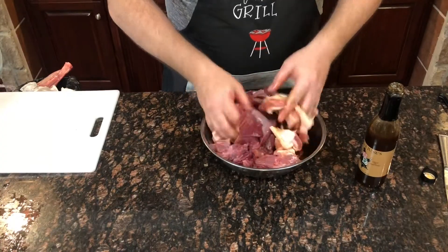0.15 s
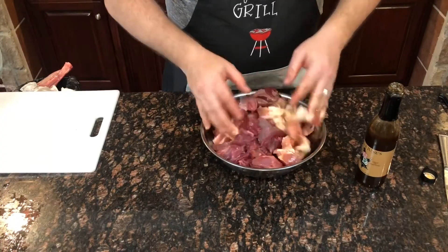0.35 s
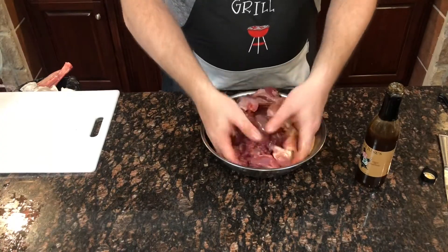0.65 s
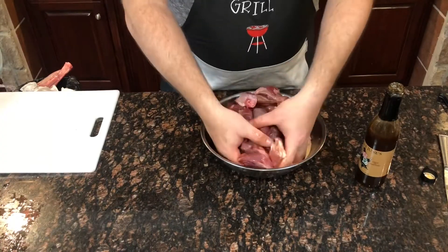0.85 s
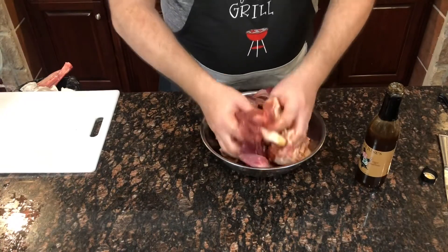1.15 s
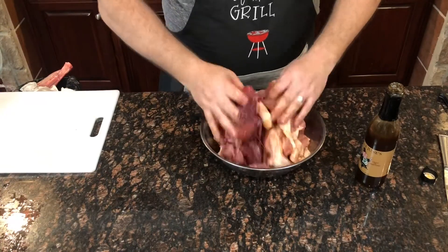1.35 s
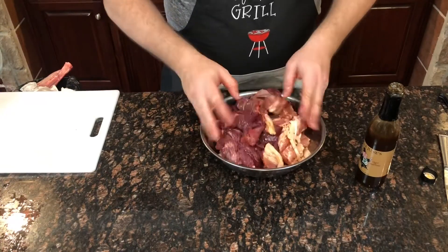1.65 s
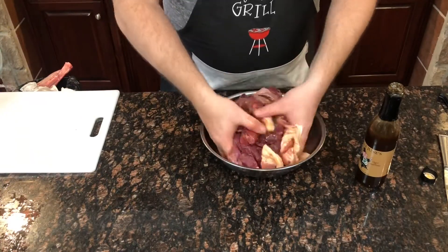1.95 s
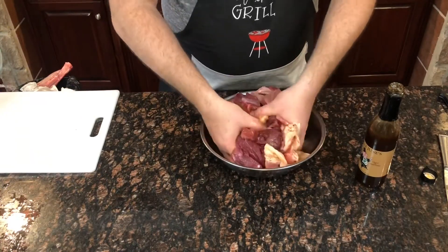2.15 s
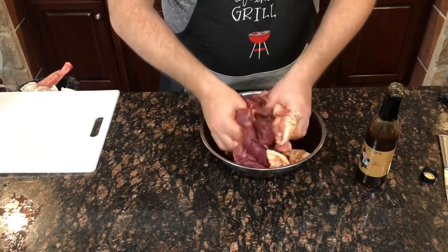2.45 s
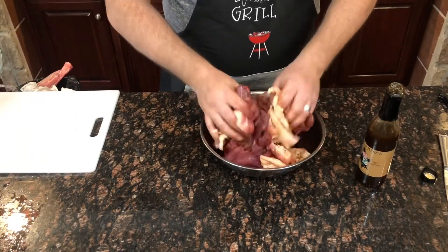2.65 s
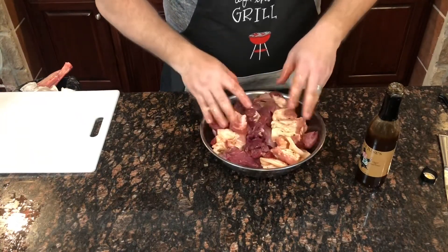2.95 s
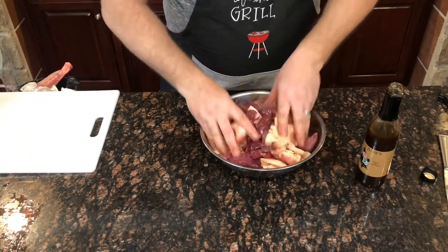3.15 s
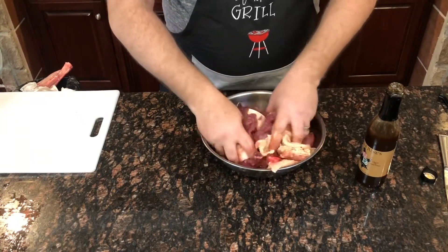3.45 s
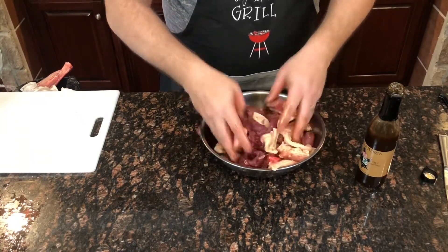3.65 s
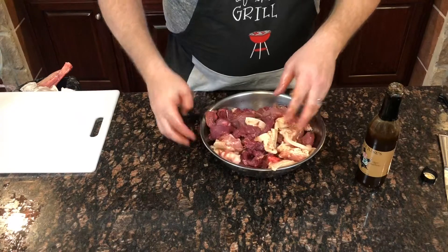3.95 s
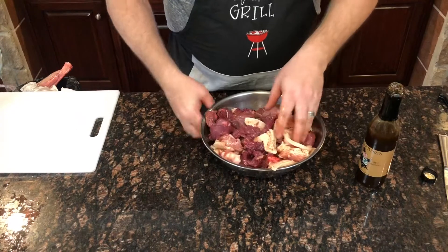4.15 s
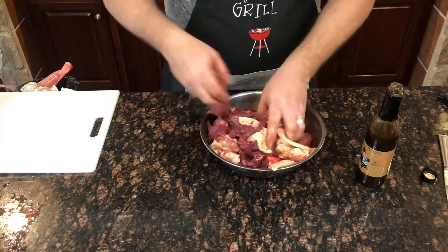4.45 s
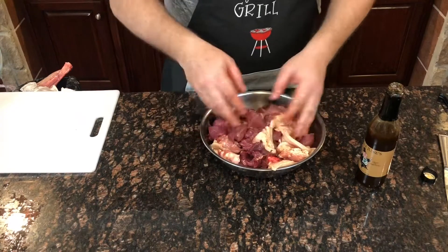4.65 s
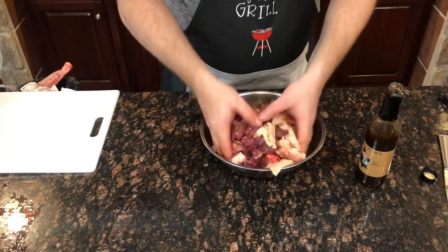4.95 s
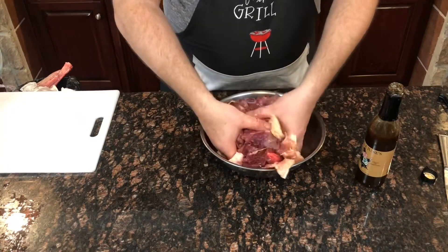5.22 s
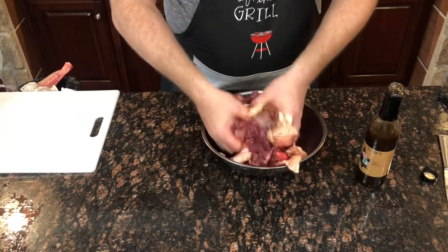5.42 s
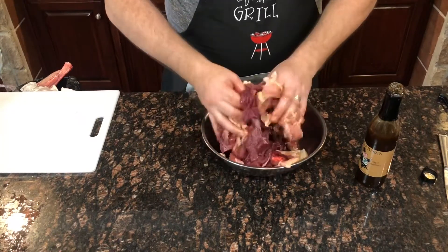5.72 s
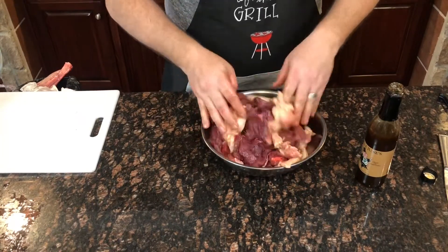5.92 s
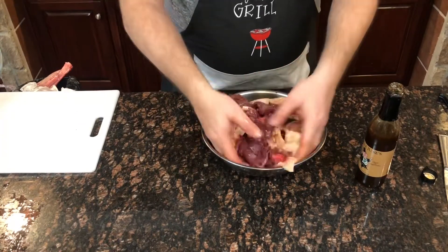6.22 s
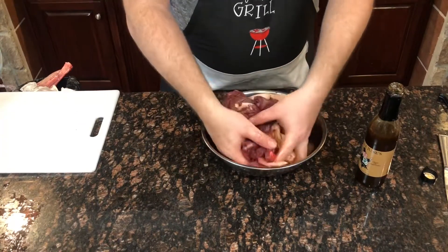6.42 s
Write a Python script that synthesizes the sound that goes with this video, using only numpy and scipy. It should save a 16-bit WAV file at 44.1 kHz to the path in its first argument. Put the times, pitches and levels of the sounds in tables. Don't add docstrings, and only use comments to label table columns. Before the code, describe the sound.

Hands knead wet raw meat in a thin steel bowl with soft squelches, sticky crackles, sharp smacks and one bright rim clang near the end.

```python
import sys
import numpy as np
from scipy import signal
from scipy.fft import rfft, irfft
from scipy.io import wavfile

SR = 44100
rng = np.random.default_rng(int(sys.argv[2]) if len(sys.argv) > 2 else 0)


def put_to_file(sound):
    columns = np.atleast_2d(sound).T
    safe = np.clip(columns, -1, 1)
    whole_steps = np.round(safe * 32767)
    wavfile.write(sys.argv[1], SR, whole_steps.astype(np.int16))


def invert_db(level):
    return 10 ** (np.asarray(level, dtype=float) / 20)


N = 290237


def rms_one(x):
    return x / np.sqrt(np.mean(x ** 2) + 1e-20)


def at_hz(points, hz):
    table_hz, values = np.transpose(points)
    return np.interp(np.log(hz), np.log(table_hz), values)


def in_time(rows):
    s, *columns = np.transpose(rows)
    return [np.interp(np.arange(N) / SR, s, c) for c in columns]


def drift(rate):
    r = np.exp(-80 * np.pi * rate / SR)
    noise = rng.standard_normal(N // 40 + 2002)
    slow = signal.lfilter([1], [1, -2 * r, r * r], noise)[2000:]
    return np.interp(np.arange(N) / 40, np.arange(len(slow)), rms_one(slow))


def ring(x, hz, t60):
    r, w = invert_db(-60 / (t60 * SR)), 2 * np.pi * hz / SR
    return signal.lfilter([0, np.sin(w)], [1, -2 * r * np.cos(w), r * r], x + 1e-18)


def add(track, s, sound):
    i = round(s * SR)
    track[i:i + len(sound)] += sound[:N - i]


def coloured(x, spectrum):
    hz = np.maximum(np.arange(len(x) // 2 + 1) * SR / len(x), 1)
    return rms_one(irfft(rfft(x) * invert_db(at_hz(spectrum, hz)), len(x)))


def grains(per_s, spread_db, clump_db):
    sizes = invert_db(spread_db * np.minimum(rng.exponential(1, N), 4)) * rng.choice([-1, 1], N)
    return sizes * (rng.random(N) < per_s * invert_db(clump_db * drift(15)) / SR)


def crackle(low_hz, high_hz, per_s, cycles, spread_db):
    clicks = grains(per_s, spread_db, clump_db=7.5)
    dealt = rng.integers(0, 12, N)
    pitches = low_hz * (high_hz / low_hz) ** (np.arange(12) / 11)
    return rms_one(sum(ring(clicks * (dealt == k), hz, cycles / hz) for k, hz in enumerate(pitches)))


# (frequency [Hz], level [dB per Hz])
ROOM_AIR = [(15, -63), (25, -15), (60, -9.5), (202, -3), (296, -5), (410, -5.5), (457, -9), (876, -15.5),
            (977, -23.5), (3900, -30), (12900, -40), (15700, -32), (15950, -63)]


def room_air():
    return invert_db(-60.5) * coloured(rng.standard_normal(N), ROOM_AIR)


# (time [s], level [dB rms])
HUM_SWELL = [(0.0, -68.5), (0.09, -60.5), (4.23, -67), (4.55, -62), (4.76, -67.5), (5.33, -59), (5.44, -67),
             (6.34, -62), (6.58, -70)]
# (frequency [Hz], width [Hz], level [dB rms])
DRONE_BANDS = [(119.5, 3.6, -72), (153.1, 8.8, -68.5), (176.4, 3.2, -69.5), (246.6, 18, -69.5)]


def appliance():
    turns = 203.6 * np.arange(N) / SR
    tone = invert_db(in_time(HUM_SWELL)[0] + 3.5 + 1.0 * drift(16.0)) * np.sin(2 * np.pi * turns)
    octave = invert_db(-71 + 3 + 2.2 * drift(1.5)) * np.sin(4 * np.pi * turns)
    drone = sum(invert_db(db) * rms_one(ring(rng.standard_normal(N), hz, 3.1 / width))
                for hz, width, db in DRONE_BANDS)
    return tone + octave + drone


# (frequency [Hz], t60 [s])
KITCHEN_T60 = [(500, 0.89), (1500, 0.52), (4000, 0.34), (10000, 0.29)]


def kitchen(x):
    t, tail = np.arange(SR) / SR, 0
    for hz in 350 * 2. ** np.arange(6):
        band = signal.butter(2, [hz / np.sqrt(2), hz * np.sqrt(2)], "band", fs=SR, output="sos")
        fade = invert_db(-60 * t / at_hz(KITCHEN_T60, hz))
        tail = tail + signal.sosfilt(band, rng.standard_normal(SR)) * fade
    tail = tail * (1 - np.exp(-(t / 0.00093) ** 2))
    return invert_db(-7) * signal.fftconvolve(x, tail / np.sqrt(np.sum(tail ** 2)))[:N]


# (time [s], peak level [dB], pitch [Hz], t60 [s])
COUNTER_THUMPS = [
    (1.617, -47, 270, 0.54),
    (2.619, -47.5, 96, 0.29),
    (4.372, -43, 89.4, 0.25),
    (4.669, -44, 252, 0.17),
    (5.967, -49.5, 83.4, 0.29),
]


def thumps():
    out, t = np.zeros(N), np.arange(18000) / SR
    for s, db, hz, t60 in COUNTER_THUMPS:
        noise = rng.standard_normal(len(t))
        band = signal.butter(2, [hz / 2.3, hz * 1.37], "band", fs=SR, output="sos")
        thump = signal.sosfilt(band, noise * (1 - np.exp(-t / 0.0061)) * invert_db(-60 * t / t60))
        add(out, s, invert_db(db) * thump / np.abs(thump).max())
    return out


# (time [s], peak level [dB], pitch [Hz], t60 [s])
BASE_NOTES = [(1.614, -43.5, 815, 0.1), (2.543, -46, 820, 0.1), (4.672, -35.5, 757, 0.037),
              (4.893, -44.5, 670, .08), (6.302, -41, 866, 0.046), (1.616, -48.5, 269, 0.17),
              (5.21, -44, 770, 0.057)]


def base_notes():
    out, t = np.zeros(N), np.arange(18000) / SR
    for s, db, hz, t60 in BASE_NOTES:
        swell = invert_db(db - 60 * t / t60) * (1 - np.exp(-t / .004))
        partner = invert_db(-5) * np.sin(2 * np.pi * hz * .87 * t)
        add(out, s, swell * (np.sin(2 * np.pi * hz * t) + partner))
    return out


def metal(t, modes):
    return sum(invert_db(db - 60 * t / t60) * np.sin(2 * np.pi * hz * t) for hz, db, t60 in modes)


# (time [s], peak level [dB], slap t60 [s], metal ring [dB], lowest slap frequency [Hz])
BOWL_KNOCKS = [(0.325, -40.5, 0.027, -5, 1200), (0.492, -38, 0.012, -16, 1000),
               (1.303, -32, 0.016, -13, 2010), (1.61, -37, 0.066, -14, 895),
               (2.542, -37.5, 0.026, -7.5, 800), (4.672, -27, 0.031, -28, 450),
               (5.208, -34, 0.016, -27, 700), (5.316, -37.5, 0.023, -13, 1200),
               (6.079, -30.5, 0.055, -28, 1270)]
# (frequency [Hz], level [dB], t60 [s])
LOADED_BOWL = [(1840, -10, .04), (2700, -4, .06), (3190, -4, .05), (3800, -2, .06), (4540, -5, .04),
               (5300, -7, .03), (6200, -8, .03)]


def knocks():
    out, t = np.zeros(N), np.arange(13000) / SR
    for s, db, t60, ring_db, low_hz in BOWL_KNOCKS:
        band = signal.butter(2, [low_hz, 8000], "band", fs=SR)
        slap = signal.lfilter(*band, rng.standard_normal(len(t)) * invert_db(-60 * t / t60))
        add(out, s, invert_db(db) * (slap / np.abs(slap).max() + invert_db(ring_db) * metal(t, LOADED_BOWL)))
    return out


# (time [s], peak level [dB], crack t60 [s], shimmer t60 [s])
RING_CLANG = [
    (6.107, -14.5, 0.023, 0.52),
]
# (frequency [Hz], level [dB per Hz])
RIM_SHIMMER = [(180, -41), (300, -11), (490, -25), (703, -1.5), (801, -13.5), (1850, 0), (2070, -6),
               (3790, -19), (4180, -30), (4540, -7), (4850, -19), (6620, -13), (15000, -32.5)]
# (frequency [Hz], level [dB], t60 [s])
FREE_RIM = [(1200, -10.5, .15), (1640, -9.5, 0.27), (1780, -12, .25), (1844, -7, .3), (1963, -8.5, .25),
            (2659, -3, .4), (2830, -2, 0.27), (3184, -5.5, .3), (3760, -0.5, 0.8), (3850, -11, .4),
            (4550, -4, 0.27), (5350, -13, .15), (6280, -15, 0.13), (9820, -7.5, 0.054)]


def clang():
    out, t = np.zeros(N), np.arange(30000) / SR
    for s, db, crack_t60, shimmer_t60 in RING_CLANG:
        shimmer = coloured(rng.standard_normal(len(t)), RIM_SHIMMER)
        touch = invert_db(-60 * t / crack_t60)
        modes = (invert_db(-38.5) + invert_db(-3) * touch) * metal(t, FREE_RIM)
        noise = shimmer * (invert_db(-4.0) * touch + invert_db(-27.0 - 60 * t / shimmer_t60))
        add(out, s - .0007, invert_db(db) * (modes + noise) * (1 - np.exp(-t / 0.0005)))
    return out


# (start time [s], length [s], level [dB rms], pitch [Hz], final pitch sag [share])
AIR_SEEPS = [
    (2.68, 0.32, -72, 14700, .15),
    (5.58, 0.4, -73, 14600, .02),
    (6.2, .14, -72, 14300, .02),
]


def seeps():
    out = np.zeros(N)
    for s, length, db, hz, sag in AIR_SEEPS:
        u = np.arange(round(length * SR)) / (length * SR)
        low = signal.butter(2, 250, fs=SR)
        a, b = signal.lfilter(*low, rng.standard_normal((2, SR)))[:, :len(u)]
        angle = 2 * np.pi * np.cumsum(hz * (1 - sag * u ** 5)) / SR
        whistle = rms_one(a * np.cos(angle) + b * np.sin(angle))
        add(out, s, invert_db(db) * np.sqrt(np.sin(np.pi * u)) * whistle)
    return out


# (time of peak [s], swish level [dB], rise [s], fall [s])
STROKES_OFF = [
    (0.561, -58.5, 0.28, 0.2),
    (1.76, -55, 0.12, 0.22),
    (4.9, -57, 0.25, 0.15),
]
# (frequency [Hz], level [dB per Hz])
SWISH_COLOUR = [(3500, -28), (5600, -11), (6600, -2.5), (7600, -5.5), (9000, -9), (11000, -13),
                (15000, -16)]


def swish():
    t = np.arange(N) / SR
    level = sum(invert_db(db - 20 * np.maximum((s - t) / rise, (t - s) / fall))
                for s, db, rise, fall in STROKES_OFF)
    return level * invert_db(2.6 * drift(28)) * coloured(rng.standard_normal(N), SWISH_COLOUR)


def surge():
    t = np.arange(N) / SR
    surge_db, squeeze_s, drain_s = 8, 0.034, 0.11
    return sum(surge_db * np.exp(-np.maximum((s - t) / squeeze_s, (t - s) / drain_s) ** 2)
               for s, *_ in STROKES_OFF)


def bursts(events, cycles, rise, tick_db):
    out, t = np.zeros(N), np.arange(1300) / SR
    for s, db, hz in events:
        turns = hz * t
        band = signal.butter(2, [hz / 2.15, min(hz * 2.6, .45 * SR)], "band", fs=SR)
        tick = rms_one(signal.lfilter(*band, rng.standard_normal(len(t))))
        lasting = max(cycles - 0.5 * max(db + 37, 0), 2.1)
        decay = invert_db(-60 * turns / lasting / 3)
        tone = np.sin(2 * np.pi * turns * (1 + rise * np.minimum(turns / 20, 1)))
        tone = tone * (1 - np.exp(-turns * 1.5))
        add(out, s, invert_db(db) * (tone * decay + invert_db(tick_db) * tick * np.exp(-t / 0.0013)))
    return out


# (time [s], peak level [dB], pitch [Hz])
AIR_POPS = [(0.473, -43, 1410), (0.4908, -40, 1420), (0.54, -50, 1310), (0.5931, -38.5, 2000),
            (0.7075, -34.5, 2340), (0.9453, -38, 1480), (1.0108, -37.5, 1270), (1.0635, -45.5, 1380),
            (1.7494, -49, 902), (1.9105, -40.5, 1550), (2.0173, -41.5, 1660), (2.5211, -42.5, 1570),
            (2.592, -41, 1120), (3.1627, -37, 1670), (3.203, -39, 1850), (3.7733, -46, 2180),
            (4.472, -47.5, 2020), (4.6593, -45, 870), (4.7935, -39, 1780), (4.8744, -39, 1710),
            (4.8908, -34.5, 1620), (5.1691, -46, 1730), (5.2295, -41, 1570), (5.3582, -39, 2140),
            (5.3792, -41.5, 1280), (5.4315, -40, 1660), (5.7, -41, 2280), (6.0651, -32, 1930),
            (6.4544, -38, 2090), (6.5252, -44, 1490)]
# (time [s], peak level [dB], pitch [Hz])
MEAT_SMACKS = [(0.1171, -48, 4700), (0.3246, -51, 3660), (0.9042, -39, 2550), (0.9282, -35, 4240),
               (1.043, -36.5, 2580), (1.1568, -37, 4050), (1.3038, -14, 3300), (1.611, -38, 2670),
               (1.8601, -35, 2900), (1.8931, -34, 2760), (2.1964, -34.5, 4300), (2.2772, -31, 4150),
               (2.3174, -21, 5500), (2.3465, -39, 4470), (2.4289, -33, 3500), (3.0335, -40.5, 4200),
               (3.0953, -42, 4930), (3.1507, -38, 4200), (3.4884, -42.5, 3550), (3.7394, -46.5, 4480),
               (4.0641, -45, 2550), (4.3181, -44, 4100), (5.1881, -36, 4700), (5.2085, -19, 3000),
               (5.3158, -35, 2620), (5.3475, -37, 3900), (5.5758, -38, 4200), (6.4379, -39.5, 4330),
               (6.4768, -38, 2450), (6.5013, -43, 2830)]
# (time [s], peak level [dB], pitch [Hz])
FILM_SNAPS = [(0.2097, -36, 14700), (0.393, -39, 14900), (0.6779, -34, 14800), (0.9197, -42, 6600),
              (0.9786, -42, 7960), (1.3034, -25, 10300), (1.6302, -38, 6700), (1.7294, -32, 7500),
              (1.7492, -30, 6260), (1.969, -29, 12500), (2.0362, -38, 8950), (2.075, -33, 14000),
              (2.3455, -31, 7800), (2.5591, -35, 8400), (2.793, -42.5, 6400), (3.1856, -35.5, 8500),
              (3.2076, -35, 14900), (3.4056, -37.5, 8160), (3.4974, -33, 15400), (3.5143, -30.5, 6700),
              (3.5837, -39, 13300), (4.4777, -44, 12100), (4.6708, -26, 7600), (4.733, -20.5, 9200),
              (4.795, -40, 7300), (5.2085, -40, 7660), (5.3153, -36, 9600), (5.432, -27.5, 5900),
              (6.0514, -43, 7400), (6.084, -29, 7240)]
# (time [s], peak level [dB], pitch [Hz])
MORE_SNAPS = [(.4115, -41, 6400), (.4908, -46, 5000), (.6569, -41.5, 3830), (.706, -45.5, 5000),
              (.8205, -47, 5800), (1.0633, -44, 4500), (1.1074, -46, 5500), (1.1604, -41, 8650),
              (2.047, -38, 4300), (2.1191, -38, 8970), (2.4764, -48, 7540), (2.7172, -45, 2480),
              (2.7657, -42.5, 7000), (3.0031, -50.5, 4260), (3.105, -42.5, 3440), (3.2724, -42, 8150),
              (3.2884, -41, 4370), (3.4057, -42, 4600), (3.5668, -41, 14500), (3.982, -44.5, 6760),
              (4.286, -49.5, 1830), (4.8379, -39.5, 4460), (5.0404, -46, 9200), (5.6526, -47, 6000),
              (5.7514, -45, 4670), (5.9344, -51, 10500), (6.3764, -45, 6410), (6.544, -45, 9190),
              (3.535, -49, 2240), (4.12, -52, 1410)]


def pockets():
    pops = bursts(AIR_POPS, cycles=5.4, rise=0.017, tick_db=-6)
    smacks = bursts(MEAT_SMACKS, cycles=6.9, rise=0.021, tick_db=-22)
    snaps = bursts(FILM_SNAPS, cycles=7.8, rise=0.025, tick_db=-17)
    more_snaps = bursts(MORE_SNAPS, cycles=8.9, rise=0.025, tick_db=-11)
    return pops + smacks + snaps + more_snaps


# (time [s], pressure as squelch level [dB], sliding as film hiss level [dB])
HANDS = [(0.0, -73.5, -65.5), (0.45, -59.5, -78.5), (0.75, -63.5, -70.5), (1.17, -64.5, -64),
         (1.43, -78, -64), (1.67, -61, -78), (2.33, -60.5, -62), (2.9, -72.5, -68), (3.25, -58, -66),
         (3.63, -71.5, -80.5), (4.35, -69.5, -67.5), (4.52, -87, -75), (4.71, -57, -86), (5.13, -63, -67),
         (5.33, -58, -66), (5.5, -69.5, -63.5), (6.1, -65.5, -67.5), (6.58, -58.5, -67)]
# (frequency [Hz], level [dB per Hz])
SQUELCH_COLOUR = [(240, -63), (400, 1), (511, -8), (570, 1), (1200, -11), (1480, -5.5), (3000, -20.5),
                  (3900, -87), (6600, -120)]
# (frequency [Hz], level [dB per Hz])
FILM_COLOUR = [(3500, -6.5), (5500, -5), (8500, -6), (11000, -6.5), (15000, -8.5), (15750, 0), (15950, -48)]


def kneading():
    pressure_db, film_db = in_time(HANDS)
    surge_db = surge()
    squelch_db = pressure_db + surge_db
    fizz_db = -69.5 + 0.8 * (pressure_db + 64) + 0.83 * surge_db
    squelch = invert_db(squelch_db - 7.5) * coloured(grains(2500, spread_db=0.5, clump_db=3.0), SQUELCH_COLOUR)
    gurgle = invert_db(squelch_db - 4.0) * crackle(1122, 2060, per_s=260, cycles=9.4, spread_db=2.8)
    fizz = invert_db(fizz_db) * crackle(2410, 5380, per_s=700, cycles=20.0, spread_db=4.5)
    film_hiss = coloured(grains(3300, spread_db=4.0, clump_db=-1), FILM_COLOUR)
    film = invert_db(film_db + 1.7 * surge_db - 2.5) * film_hiss
    ticks = invert_db(film_db - 8.5) * crackle(4600, 14000, per_s=47, cycles=14.0, spread_db=5.0)
    return squelch + gurgle + fizz + film + ticks


def scene():
    close = kneading() + pockets() + swish() + seeps() + knocks() + clang()
    air = room_air()
    return (close + air + kitchen(close) + thumps() + base_notes() + appliance())[None]


def low_pass(x):
    return signal.sosfilt(signal.butter(12, 16590, fs=SR, output="sos"), x)


def record(dry):
    x = signal.sosfilt(signal.butter(4, 48, "high", fs=SR, output="sos"), dry)
    x = signal.sosfilt(signal.cheby2(12, 50, 16500, fs=SR, output="sos"), x)
    return low_pass(x)


dry = scene()
out = record(dry)
put_to_file(out)
```